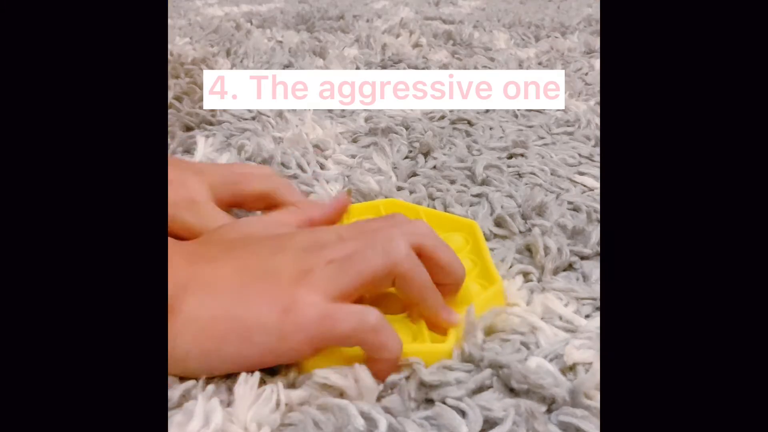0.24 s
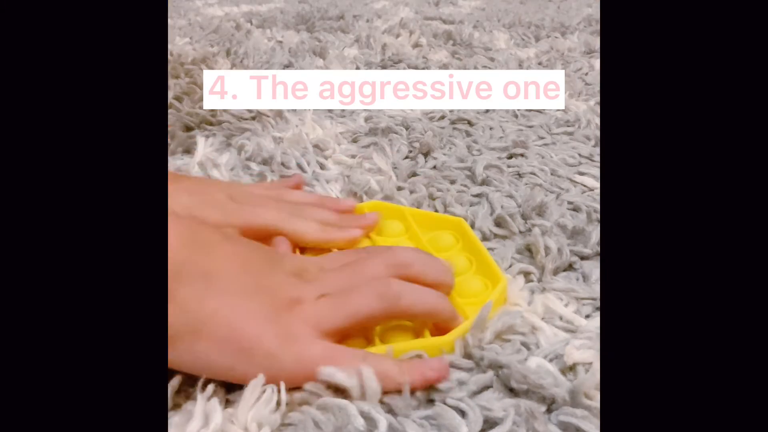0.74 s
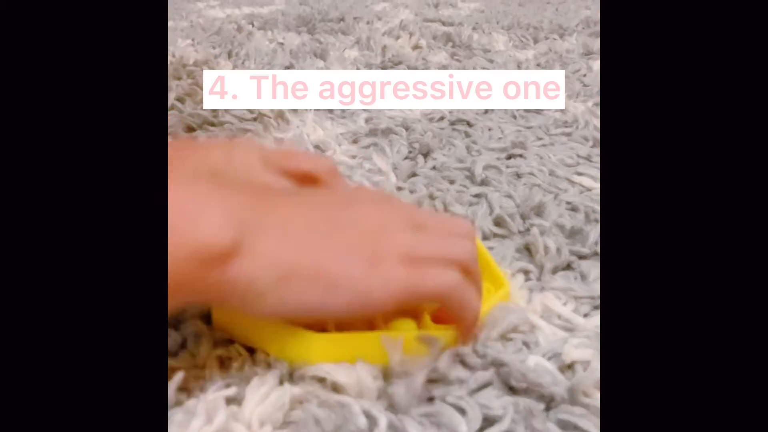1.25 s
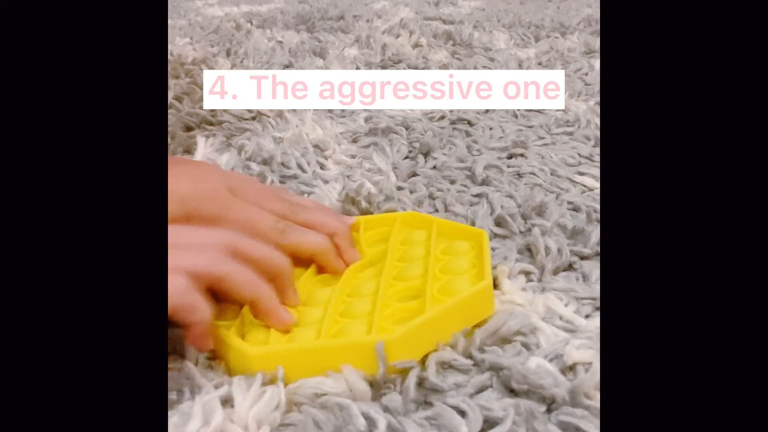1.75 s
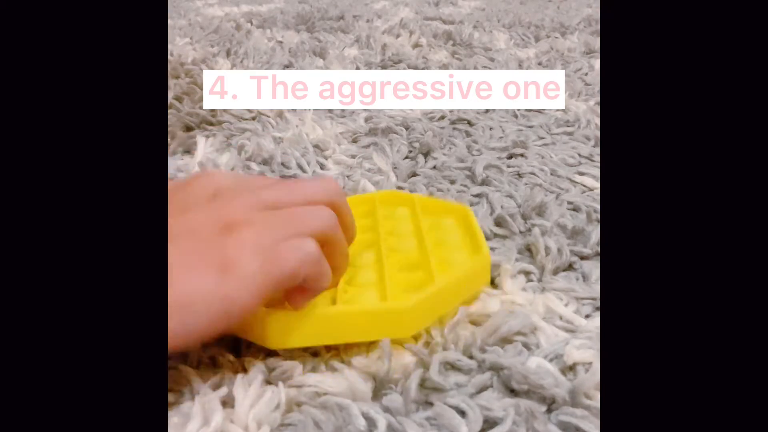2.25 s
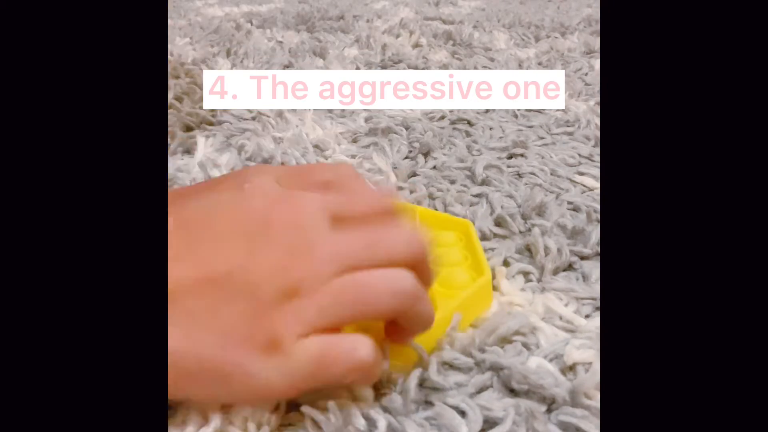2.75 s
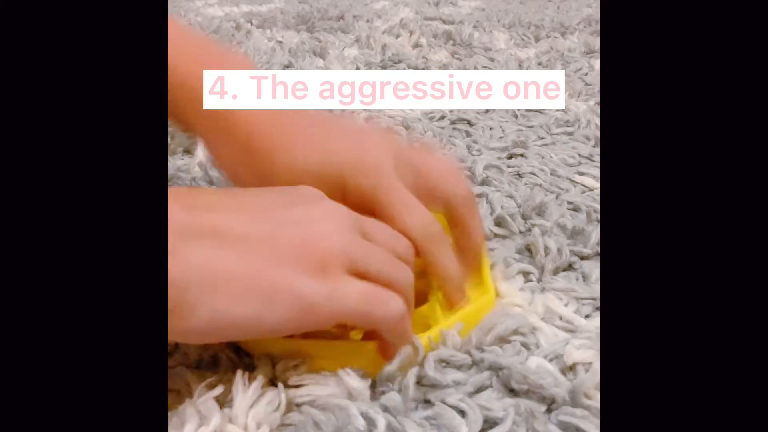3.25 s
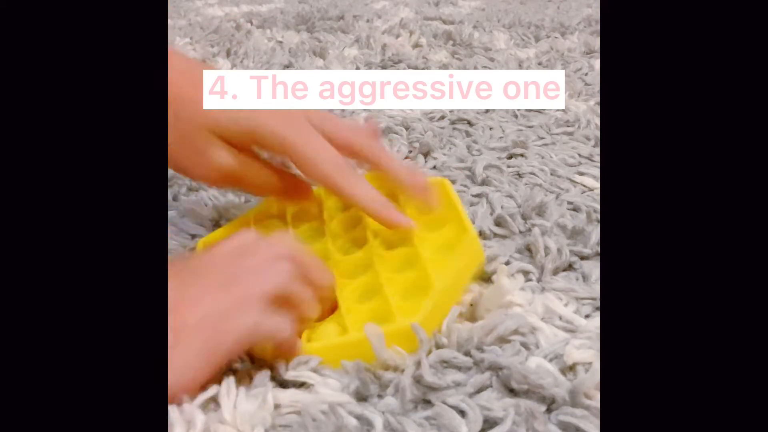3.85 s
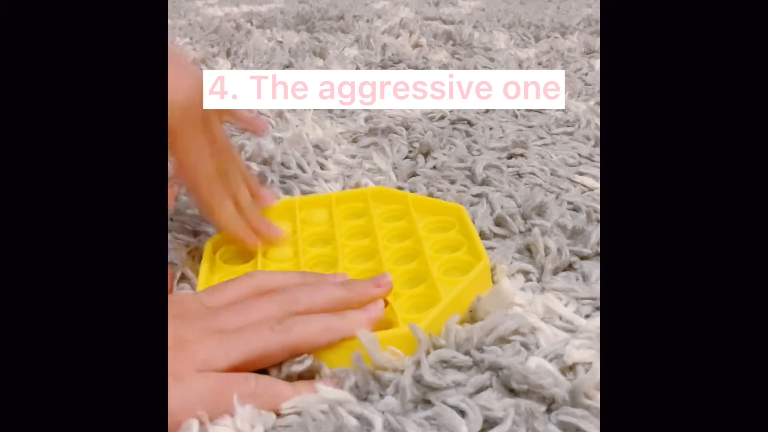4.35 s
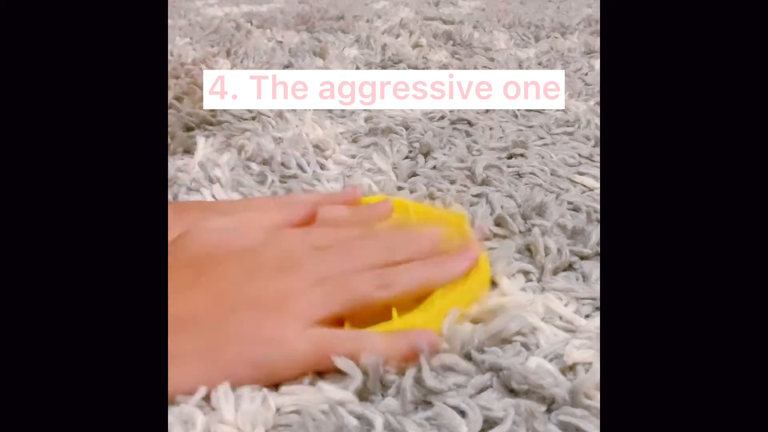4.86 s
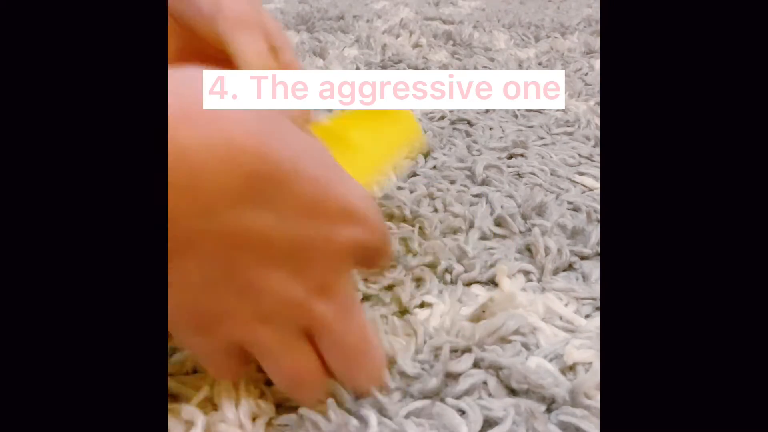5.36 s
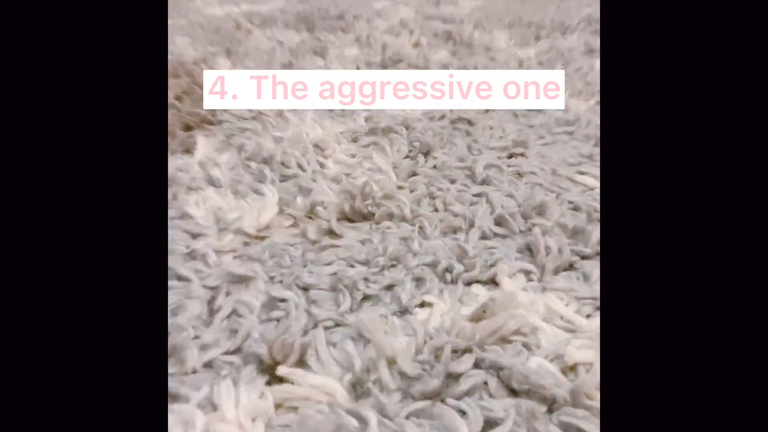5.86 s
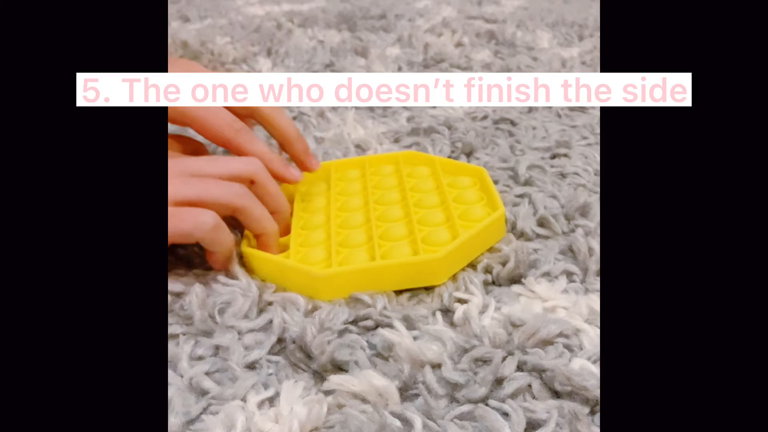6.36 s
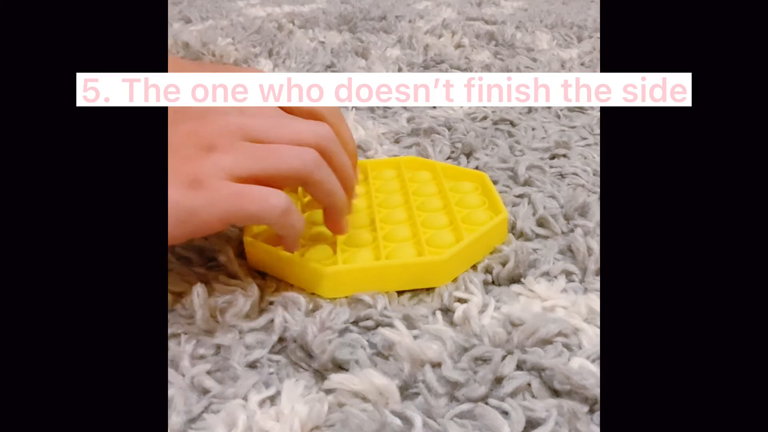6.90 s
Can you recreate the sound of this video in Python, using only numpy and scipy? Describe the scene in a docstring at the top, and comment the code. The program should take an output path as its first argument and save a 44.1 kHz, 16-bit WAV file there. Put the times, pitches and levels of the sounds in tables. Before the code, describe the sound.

Fast, uneven popping of flexible silicone domes, each a brief hollow knock with a snappy edge, mixed with nail ticks and palms brushing the surface. A sharp bright tick stands out at two seconds and a hard snap after three. The loudest hollow pop and thud come near the end of the fifth second, then quiet with soft bumps and a final quick cluster. Small soft room, close microphone, faint hiss and rumble.

```python
"""Short hollow pops come in quick bunches, with sharp ticks, rubbing and a few soft thuds in a quiet room.
Two hands press the silicone domes of a bubble fidget toy on a shaggy rug: each dome snaps through and its
air pocket rings briefly. Nails and skin tick as noise bursts, palms rub as uneven noise, hands thud as low
swells, and skin squeaks faintly once. Room rumble lies below; near the end a faint mains hum fades in.
A close two-port microphone hears it all and adds a little hiss."""
import sys
import numpy as np
from scipy import signal
from scipy.fft import rfft, irfft, next_fast_len
from scipy.io import wavfile

SR = 44100
rng = np.random.default_rng(int(sys.argv[2]) if len(sys.argv) > 2 else 0)


def dump(signal):
    """Clip the signal to [-1, 1] and save it as 16-bit WAV at the path in sys.argv[1]."""
    limited = np.clip(np.atleast_2d(signal).T, -1, 1)
    pcm = np.round(limited * 32767).astype(np.int16)
    wavfile.write(sys.argv[1], SR, pcm)


N = 314426


def pops():
    """A dome gives softly, its wall snaps with a falling pitch and a rasp, its air pocket pops and wobbles."""
    # domes flipping: (time of pocket peak [s], pocket peak [dB], pocket pitch at its peak [Hz], snap peak [dB])
    domes = [(0.111, -33.5, 426, -42), (0.1672, -27.5, 610, -44.5), (0.176, -33.5, 494, -71),
             (0.241, -17, 602, -38), (0.2979, -27.5, 514, -35), (0.3105, -18.5, 686, -27.5),
             (0.316, -12.5, 680, -24.5), (0.3261, -19, 572, -25.5), (0.342, -14, 606, -26.5),
             (0.3874, -32.5, 470, -30), (0.417, -33.5, 501, -50), (0.483, -24.5, 533, -32.5),
             (0.5159, -21, 553, -26.5), (0.5305, -27, 428, -37.5), (0.5396, -22, 685, -54),
             (0.5594, -19.5, 625, -58), (0.573, -25, 408, -34), (0.6143, -31.5, 428, -39.5),
             (0.632, -32, 527, -43), (0.649, -33, 590, -46), (0.669, -29.5, 643, -30.5),
             (0.81, -38.5, 370, -47), (0.9592, -34, 687, -29.5), (1.005, -28.5, 850, -30.5),
             (1.0303, -24.5, 663, -35), (1.0854, -19.5, 650, -29), (1.1776, -34.5, 610, -67),
             (1.232, -23, 700, -28), (1.2951, -32, 600.5, -35.5), (1.316, -27, 725, -37),
             (1.3393, -28.5, 621, -42), (1.485, -30, 570, -41.5), (1.557, -24, 805, -25.5),
             (1.8163, -20, 691, -43), (1.993, -20.5, 749, -29), (2.0052, -16.5, 835, -21),
             (2.0744, -12.5, 718, -17.5), (2.1236, -24.5, 676, -61.5), (2.2278, -39.5, 594, -72),
             (2.43, -38, 690, -41.5), (2.6167, -25, 600, -56), (2.678, -42.5, 650, -43),
             (2.6985, -21.5, 717, -39.5), (2.7046, -21.5, 603, -33), (2.724, -31.5, 490, -65),
             (2.8078, -33.5, 574, -59), (2.882, -34, 520, -51), (2.892, -26, 525, -24),
             (2.981, -30.5, 640, -47.5), (2.9979, -30, 753, -43), (3.05, -31, 558, -50),
             (3.08, -24, 709, -45), (3.1696, -37.5, 592, -44.5), (3.2844, -26.5, 521, -40),
             (3.308, -35, 580, -58), (3.367, -13, 750, -8.5), (3.387, -21, 686.4, -42),
             (3.414, -27, 680, -32.5), (3.446, -25.5, 498, -41.5), (3.498, -34, 730, -52),
             (3.5864, -19, 747, -21.5), (3.5956, -25, 567, -31), (3.623, -16.5, 617.6, -23),
             (3.77, -14, 762, -29.5), (3.794, -29.5, 525, -50.5), (3.828, -25.5, 754, -31.5),
             (3.891, -20, 722, -31), (4.021, -33, 680, -49), (4.148, -37, 820, -41.5),
             (4.267, -26.5, 574, -70), (4.3499, -37.5, 820, -55), (4.807, -4.5, 513, -28),
             (4.842, -17.5, 640, -29.5), (5.4403, -47, 400, -54.5), (5.4624, -50, 386, -48.5),
             (5.807, -35, 890, -43.5), (6.305, -29.5, 674, -64), (6.3179, -18.5, 671, -33.5),
             (6.327, -15, 921, -19), (6.3408, -23.5, 563, -30.5)]
    snap_lead_s = 0.0035  # the snap comes this long before the pocket's peak
    pocket_cycles = 0.43  # sets how few swings the pocket makes
    snap_end_hz, snap_extra_hz = 1227, 1390  # average final pitch, and how far above it the snap starts
    snap_fall_s, snap_swell_s = 0.00086, 0.00036
    rasp_db, rasp_t60_s = -23.5, 0.01  # level against the snap, time to die by 60 dB
    give_db = -27.5  # first give against the pocket
    wobble_s, wobble_db = 0.005, -16.5  # delay after the pocket, average level against it

    out = np.zeros((2, N))
    phases = rng.uniform(0, 2 * np.pi, (len(domes), 2, 2, 1))
    phases[:, 0, 0] = -np.pi / 2 - 4 * np.pi * pocket_cycles  # in row 0 the pocket peaks as suction
    t = np.arange(400) / SR
    draws = rng.standard_normal(len(domes))
    swell = (t / snap_swell_s / 2) ** 2 * np.exp(2 - t / snap_swell_s)

    rasp_band = signal.butter(3, [1000, 3700], "band", fs=SR, output="sos")
    rasps = signal.sosfilt(rasp_band, rng.standard_normal((len(domes), 2, len(t))))
    rasps = amp(rasp_db - 60 * t / rasp_t60_s) * rms_one(rasps)

    for dome, (pocket_phase, other_phase), draw, rasp in zip(domes, phases, draws, rasps):
        s, pocket_db, pocket_hz, snap_db = dome
        add_swell(out, s, pocket_db, pocket_hz, cycles=pocket_cycles, sag=0.014, phase=pocket_phase)

        snap_hz = (1 + 0.17 * draw) * (snap_end_hz + snap_extra_hz * np.exp(-t / snap_fall_s))
        snap = swell * np.sin(2 * np.pi * np.cumsum(snap_hz) / SR + other_phase)
        add(out, s - snap_lead_s - 2 * snap_swell_s, amp(snap_db) * snap)
        add(out, s - snap_lead_s, amp(snap_db) * rasp)

        give_s = s - 2 * snap_lead_s
        add_swell(out, give_s, pocket_db + give_db, pocket_hz, cycles=0.8, sag=0.017, phase=other_phase)
        level_db = pocket_db + wobble_db + 1.1 * draw
        add_swell(out, s + wobble_s, level_db, 0.85 * pocket_hz, cycles=0.6, sag=0.4, phase=other_phase)
    return out


def ticks():
    """Skin lets go in sub-millisecond noise bursts with a short after-crackle: a bright and a duller part."""
    # nails and skin letting go of the silicone: (time [s], bright peak [dB], dull peak [dB])
    releases = [(0.1723, -31, -56), (0.2375, -27, -34), (0.293, -37.5, -34), (0.308, -23.5, -26.5),
                (0.3198, -12, -21.5), (0.3374, -10, -24), (0.383, -13, -34), (0.446, -40, -37),
                (0.479, -40, -30.5), (0.5248, -35.0, -26), (0.535, -30, -43), (0.5694, -25, -32.5),
                (0.628, -35, -36), (0.666, -35, -19.5), (1.022, -35.5, -32.5), (1.0816, -33, -32.5),
                (1.228, -38.5, -42), (1.291, -40, -34), (1.4811, -34, -47), (1.553, -41, -25.5),
                (1.718, -46, -60), (1.9874, -2, -24.5), (2.119, -30, -48.5), (2.425, -34.5, -44),
                (2.621, -42, -49.5), (2.692, -31, -44), (2.708, -25, -32), (2.995, -36.5, -41.5),
                (3.076, -33.5, -42), (3.411, -16.5, -17), (3.441, -35, -34), (3.583, -26, -20),
                (3.591, -21, -26.5), (3.62, -19.5, -20), (3.6276, -19.5, -30.5), (3.7652, -31.5, -36),
                (3.824, -39, -42.5), (3.887, -25, -32), (4.143, -38.5, -41.5), (4.8033, -22.5, -25.5),
                (4.809, -38, -25), (4.836, -14, -19.5), (4.845, -29.5, -32), (4.984, -63, -47.5),
                (5.029, -44, -53.5), (5.804, -63, -32), (6.3207, -28.5, -24), (6.3353, -25.5, -26)]
    out, t = np.zeros((2, N)), np.arange(500) / SR
    noise = rng.standard_normal((len(releases), 2, 2, len(t)))
    dull_band = signal.butter(2, [2200, 5800], "band", fs=SR, output="sos")
    bright_band = signal.butter(4, [8900, 15000], "band", fs=SR, output="sos")
    snap = (t / 0.0002) ** 2 * np.exp(-t / 0.0002)
    burst = snap + 0.2 * np.exp(-t / 0.003)  # snap plus after-crackle
    for (s, bright_db, dull_db), (bright_noise, dull_noise) in zip(releases, noise):
        bright = signal.sosfilt(bright_band, bright_noise * burst)
        dull = signal.sosfilt(dull_band, dull_noise * burst)
        # start early, so that the bursts peak near s
        add(out, s - 0.0006, amp(bright_db) * bright / abs(bright).max(1, keepdims=True))
        add(out, s - 0.0007, amp(dull_db) * dull / abs(dull).max(1, keepdims=True))
    return out


def thuds():
    """A soft contact makes a low swell and a dying rumble of the floor."""
    # hands and toy landing on the rug: (time of swell peak [s], swell peak [dB], pitch at the peak [Hz])
    landings = [(0.317, -35.5, 196), (0.347, -45, 103), (1.089, -37.5, 210), (1.236, -40.5, 225),
                (2.614, -40.5, 112), (3.3, -38, 83), (3.898, -42.5, 95), (4.027, -41, 105),
                (4.277, -35, 96.9), (4.812, -16, 200), (4.853, -19.5, 72), (5.447, -41, 88.1),
                (5.826, -43.5, 146), (5.835, -37, 300), (5.846, -41, 330), (5.857, -42, 55),
                (5.886, -41.5, 77.4)]
    out = np.zeros((2, N))
    phases = rng.uniform(0, 2 * np.pi, (len(landings), 2, 1))
    low_band = signal.butter(2, [35, 260], "band", fs=SR, output="sos")
    t = np.arange(int(0.4 * SR)) / SR
    rumbles = signal.sosfilt(low_band, rng.standard_normal((len(landings), 2, len(t))))
    for (s, peak_db, hz), phase, rumble in zip(landings, phases, rumbles):
        add_swell(out, s, peak_db, hz, cycles=0.36, sag=1.0, phase=phase)
        onset = 1 - np.exp(-t / 0.00035)
        decay = amp(peak_db - 6.5 - 60 * t / 0.13)  # 60 dB in 0.13 s
        add(out, s, decay * onset * rms_one(rumble))
    return out


def rubbing():
    """Uneven slips roughen noise: the toy's body, and a hiss whose lower and upper halves waver apart."""
    # tone colour of the body of the toy: (frequency [Hz], relative level [dB per Hz])
    body_colour = [(150, -8), (300, -3), (600, -8.5), (1000, -12.5), (2000, -22.5), (3500, -30.5),
                   (6000, -48.5)]
    # tone colour of the hiss: (frequency [Hz], relative level [dB per Hz])
    hiss_colour = [(1500, -15), (3000, -4.5), (6000, -1), (9500, 2.5), (13000, 2.5), (15500, 2.5),
                   (17000, -32)]
    largest_slip, slips_per_s = 2.1, 700  # size limit in units of the mean before limiting; average rate
    slip_sizes = np.minimum(rng.exponential(1, N), largest_slip)
    slips = amp(3.1 * slip_sizes) * (rng.random(N) < slips_per_s / SR)
    noise = rng.standard_normal((2, 2, N))

    body = colour(noise[0] * (1 + 2.6 * slips), body_colour)
    body = body * stroke_gain(column=3, fall_db_per_s=190) * amp(5.2 * drift(40))
    hiss = colour(noise[1] * (1 + 7.9 * slips), hiss_colour)
    hiss = hiss * stroke_gain(column=4, fall_db_per_s=181) * amp(2.7 * drift(25))

    lower = signal.sosfilt(signal.butter(2, 6500, fs=SR, output="sos"), hiss)
    upper = signal.sosfilt(signal.butter(2, 6500, "high", fs=SR, output="sos"), hiss)
    # the minus sign keeps the two halves from cancelling where they meet
    return body + lower * amp(3 * drift(6)) - upper * amp(2 * drift(9))


def stroke_gain(column, fall_db_per_s):
    """Every stroke rises over its lead-in, holds and dies away at one rate; powers add."""
    # skin and toy over silicone and rug:
    # (full at [s], lead-in [s], hold [s], body level before wavering [dB], hiss level before wavering [dB])
    strokes = [(0.103, 0.15, 0.062, -59, -55), (0.318, 0.1, 0.055, -47.5, -48),
               (0.52, 0.26, 0.15, -49, -61.5), (0.658, 0.022, 0.15, -58, -60.5),
               (0.984, 0.071, 0.026, -54, -54), (1.23, 0.089, 0.015, -56.5, -62),
               (1.307, 0.049, 0.012, -53, -58.5), (1.576, 0.1, 0.058, -51.5, -54),
               (1.834, 0.068, 0.028, -55.5, -60), (1.992, 0.023, 0.011, -56, -54.5),
               (2.194, 0.22, 0.071, -59.5, -66), (2.425, 0.1, 0.02, -60.5, -66),
               (2.594, 0.012, 0.021, -56.5, -58.5), (2.685, 0.029, 0.016, -54, -60.5),
               (3.03, 0.21, 0.15, -56, -63), (3.276, 0.0061, 0.083, -60.5, -58),
               (3.406, 0.054, 0.079, -52.5, -55.5), (3.618, 0.044, 0.012, -50.5, -49),
               (3.765, 0.11, 0.14, -63, -64), (4.009, 0.0067, 0.014, -56, -60),
               (4.101, 0.023, 0.016, -56, -60.5), (4.26, 0.0048, 0.087, -57.5, -66),
               (4.52, 0.021, 0.013, -67, -62.5), (4.802, 0.0051, 0.061, -46, -62),
               (5.009, .03, 0.013, -61, -72), (5.165, 0.02, 0.15, -54.5, -64.5),
               (5.771, 0.069, 0.16, -83, -69), (5.82, 0.021, 0.016, -51, -55),
               (6.31, 0.012, 0.0089, -48, -64), (6.724, 0.037, 0.027, -75.5, -81.5)]
    lead_in_db = 17  # rise over the lead-in
    t, power = np.arange(0, N + 64, 64) / SR, 0  # every 64 samples is fine enough
    for row in strokes:
        s, lead_in, hold = row[:3]
        rise = lead_in_db * np.maximum(s - t, 0) / max(lead_in, 0.005)
        fall = fall_db_per_s * np.maximum(t - s - hold, 0)
        power = power + amp(row[column] - rise - fall) ** 2
    return np.interp(np.arange(N) / SR, t, np.sqrt(power))


def squeak():
    """Skin dragging on silicone makes a faint rough tone that creeps upward."""
    # (start [s], end [s], first pitch [Hz], last pitch [Hz], level [dB]); pitch and level waver around these
    start, end, from_hz, to_hz, level_db = (4.4, 4.5, 1750, 1950, -77)
    t = np.arange(N) / SR
    hz = np.interp(t, [start, end], [from_hz, to_hz]) * (1 + 0.026 * drift(60))
    shape = np.sin(np.pi * np.clip((t - start) / (end - start), 0, 1)) ** 0.5
    return amp(level_db + 3.3 * drift(50)) * shape * np.sin(2 * np.pi * np.cumsum(hz) / SR)


def background():
    """Rumble is coloured noise; late on a faint click sounds, and mains hum, a wavering tone, fades in just
    after."""
    # tone colour of the room rumble: (frequency [Hz], relative level [dB per Hz])
    rumble_colour = [(25, -11), (45, 1.5), (85, -7.5), (120, 1.5), (160, -8.5), (250, -6.5), (330, -24),
                     (600, -33.5), (1200, -58)]
    rumble_db = -62  # level it wavers around
    hum_start_s, hum_hz, hum_db = 6.13, 120, -62.5  # hum pitch and level waver a little
    click_s, click_db = hum_start_s - 0.007, -49
    t = np.arange(N) / SR
    hum = np.sin(2 * np.pi * hum_hz * t + 1.15 * drift(0.78)) * amp(hum_db + 0.9 * drift(2.0))
    hum = hum * np.clip((t - hum_start_s) / 0.031, 0, 1)  # fades in over 31 ms
    rumble = colour(rng.standard_normal((2, N)), rumble_colour)
    out = amp(rumble_db + 1.8 * drift(1.5)) * rumble + hum
    add(out, click_s, -amp(click_db) * np.exp(-np.arange(100) / 3))
    return out


def room(x):
    """The room answers with a tail of noise that dies band by band, in four unrelated draws."""
    # how the room dies away: (frequency [Hz], time to fall 60 dB [s], level [dB])
    room_decay = [(101.3, 0.35, -15), (580, 0.31, -23), (2040, 0.29, -11), (5870, 0.27, -14),
                  (13650, 0.089, -28.5)]
    walls_s, before_walls_db = 0.012, -4  # the walls answer this late; tail level before they do
    t, tail = np.arange(int(0.6 * SR)) / SR, 0
    edges = 68 * 2.0 ** np.arange(9)  # octave bands
    hz, *columns = np.transpose(room_decay)
    build_up = np.maximum(amp(before_walls_db), np.clip(t / walls_s, 0, 1) ** 4)
    for low, high in zip(edges, edges[1:]):
        t60, level_db = [np.interp(np.log(low * high) / 2, np.log(hz), c) for c in columns]
        band = signal.butter(2, [low, high], "band", fs=SR, output="sos")
        decay = amp(-60 * t / t60) * build_up
        white = rng.standard_normal((4, len(t))) * decay / np.sqrt(np.sum(decay ** 2))
        tail = tail + amp(level_db) * signal.sosfilt(band, white)
    return signal.fftconvolve(x[None], tail, axes=1)[:, :N]


def ports(pair):
    """The right port hears row 0; the left hears it later, phase-turned and partly replaced by row 1."""
    # left port against right: (frequency [Hz], phase lead before the lag [rad], level [dB], likeness [0-1])
    port_difference = [(40, 0, .8, .97), (130, .9, 0, .98), (300, 1.6, 0, .97), (470, 2.7, -5.5, .98),
                       (645, 4.3, -2, .98), (730, 4.9, 1, .97), (820, 6.3, -9, .93), (900, 8.1, -5, .92),
                       (1050, 8.7, 0, .95), (1600, 7.9, 0, .98), (2300, 7.1, -6, .95), (2900, 7.0, -1, .93),
                       (4200, 6.0, -5, .8), (5000, 5.5, -7, .2), (7600, 6.3, -2, .2), (8200, 6.4, -9, .75),
                       (9500, 6.3, -3, .97), (13000, 5.8, -1, .99), (15500, 5.3, 0, .98)]
    left_lag_s = 27 / SR
    size = next_fast_len(N + 4096)
    lead, level_db, alike = at_hz(port_difference, size)
    alike = np.clip(alike, 0, 1)
    right, other = rfft(pair, size)
    turn = np.exp(1j * (lead - 2 * np.pi * np.fft.rfftfreq(size, 1 / SR) * left_lag_s))
    left = amp(level_db) * turn * (alike * right + np.sqrt(1 - alike ** 2) * other)
    return np.array([irfft(left, size)[:N], pair[0]])


def add_swell(out, s, db, hz, cycles, sag, phase):
    """Mix in a tone that swells to its peak at s and dies within a few cycles while its pitch sags."""
    t = np.arange(int(12 * cycles / hz * SR)) / SR * hz / cycles  # time in swell units; the peak is at 2
    tone = np.sin(2 * np.pi * cycles * (t - sag * (t - 2) ** 2 / 20) + phase)
    add(out, s - 2 * cycles / hz, amp(db) * (t / 2) ** 2 * np.exp(2 - t) * tone)


def add(out, s, sound):
    """Mix a short sound in, starting at time s."""
    i = max(round(s * SR), 0)
    out[..., i:i + sound.shape[-1]] += sound[..., :N - i]


def drift(rate_hz):
    """Slow random wandering around zero with overall size 1; a higher rate wanders faster."""
    knots_per_s = 400
    knots = rng.standard_normal(int(N / SR * knots_per_s) + 2)
    r = np.exp(-2 * np.pi * rate_hz / knots_per_s)
    slow = rms_one(signal.lfilter([1], [1, -2 * r, r * r], knots))
    return np.interp(np.arange(N) / SR * knots_per_s, np.arange(len(slow)), slow)


def colour(x, spectrum):
    """Shape by a table of levels over frequency, then scale to rms 1."""
    return rms_one(irfft(rfft(x) * amp(at_hz(spectrum, N)[0]), N))


def at_hz(rows, size):
    """Read table columns at the FFT frequencies of a signal of this size."""
    hz, *columns = np.transpose(rows)
    log_hz = np.log(np.fft.rfftfreq(size, 1 / SR) + 1)  # + 1 avoids log of zero
    return [np.interp(log_hz, np.log(hz), c) for c in columns]


def rms_one(x):
    """Scale to an rms (average strength) of 1."""
    return x / np.sqrt(np.mean(x ** 2) + 1e-20)


def amp(db):
    """Turn decibels into gain."""
    return 10 ** (np.asarray(db) / 20)


def scene():
    """Hands on the toy, their room tail and the background reach the two ports."""
    hits = pops() + ticks() + thuds()
    tail = room(hits[0])
    close = hits + rubbing() + squeak() + background()
    diffuse_db = 2  # part of the tail that reaches the two ports unrelated
    return ports(close + tail[:2]) + amp(diffuse_db) * tail[2:]


def record(dry):
    """Each port adds its own hiss; the deepest bass and the top are cut."""
    # tone colour of the port hiss: (frequency [Hz], relative level [dB per Hz])
    hiss_colour = [(200, -26), (400, -6), (1000, -6), (2000, -11.5), (4000, -13.5), (5500, -9),
                   (8000, -8.5), (10500, -15), (14500, -20), (15500, -42)]
    hiss_db = -78.5  # before the cuts
    x = dry + amp(hiss_db) * colour(rng.standard_normal((2, N)), hiss_colour)
    x = signal.sosfilt(signal.butter(3, 40, "high", fs=SR, output="sos"), x)
    # steep cut, 70 dB down from 17300 Hz upward
    return signal.sosfilt(signal.cheby2(12, 70, 17300, fs=SR, output="sos"), x)


dry = scene()
out = record(dry)
dump(out)
```